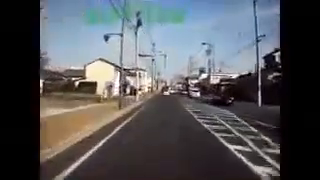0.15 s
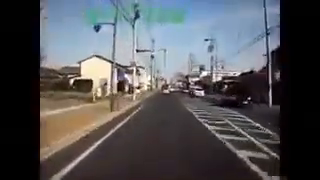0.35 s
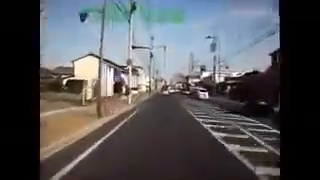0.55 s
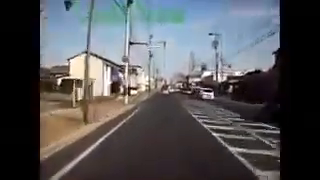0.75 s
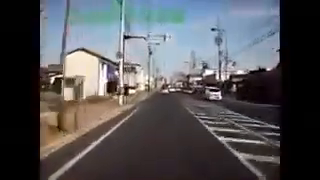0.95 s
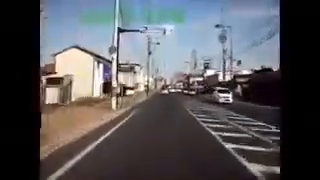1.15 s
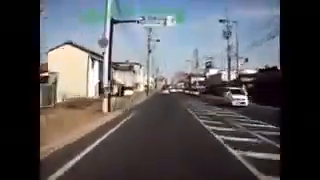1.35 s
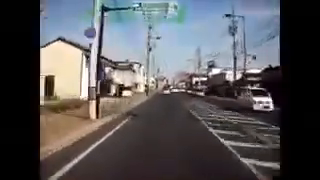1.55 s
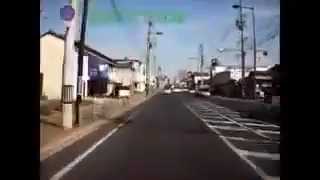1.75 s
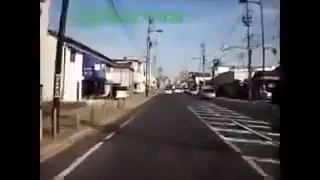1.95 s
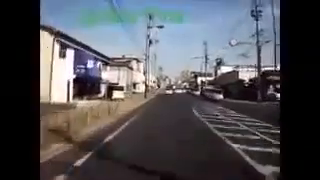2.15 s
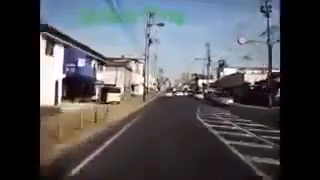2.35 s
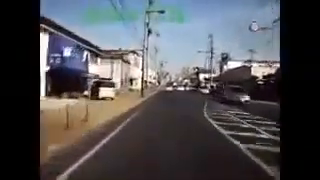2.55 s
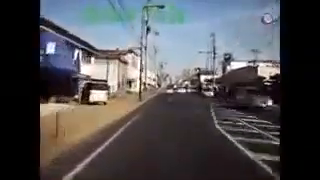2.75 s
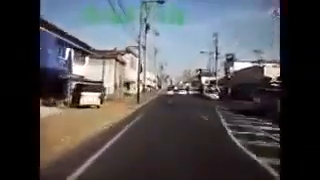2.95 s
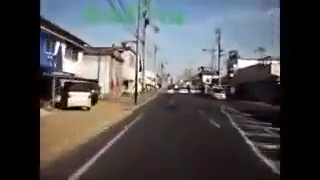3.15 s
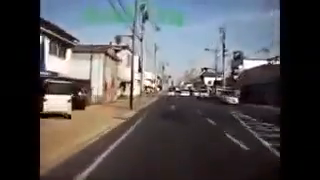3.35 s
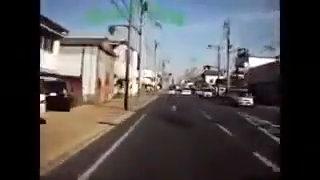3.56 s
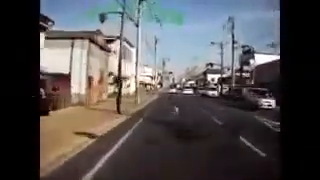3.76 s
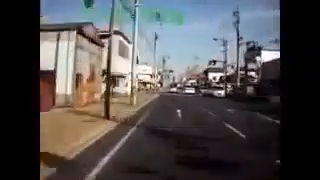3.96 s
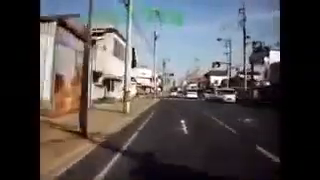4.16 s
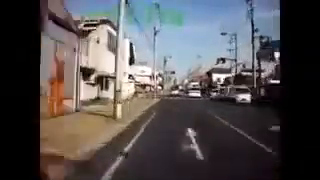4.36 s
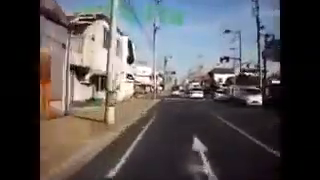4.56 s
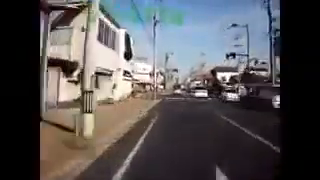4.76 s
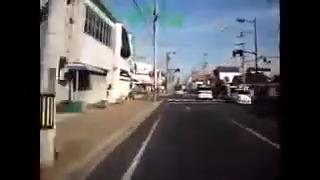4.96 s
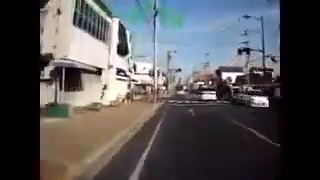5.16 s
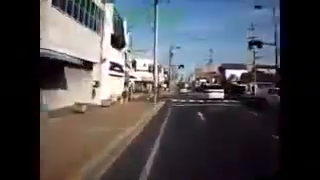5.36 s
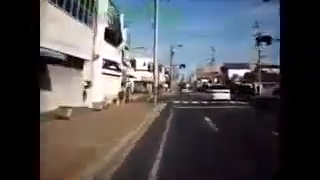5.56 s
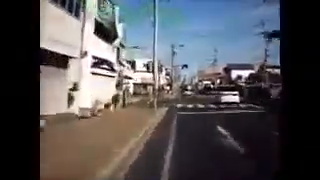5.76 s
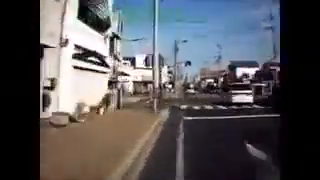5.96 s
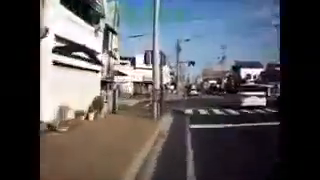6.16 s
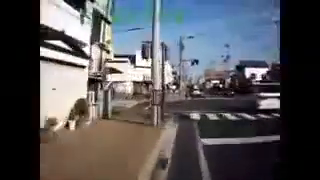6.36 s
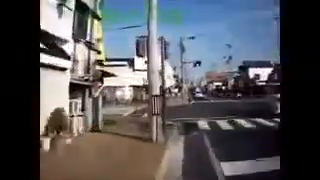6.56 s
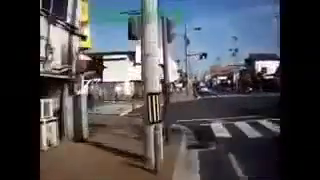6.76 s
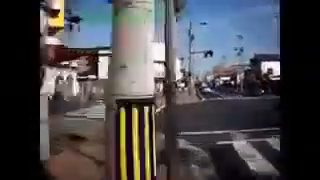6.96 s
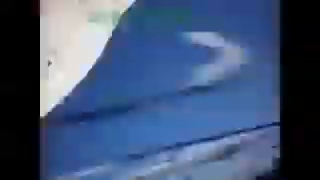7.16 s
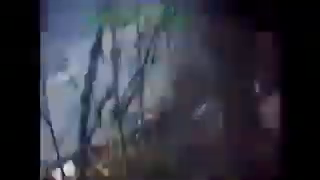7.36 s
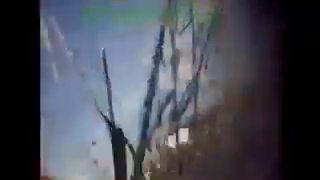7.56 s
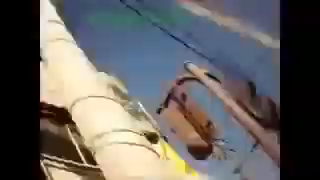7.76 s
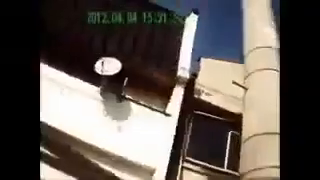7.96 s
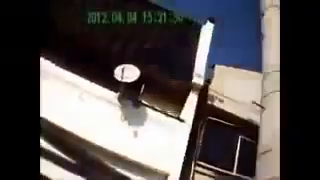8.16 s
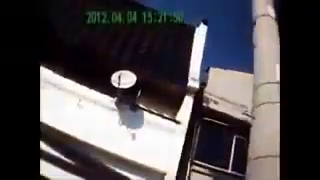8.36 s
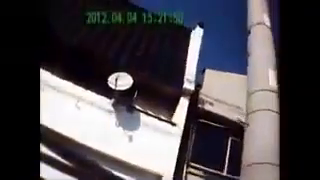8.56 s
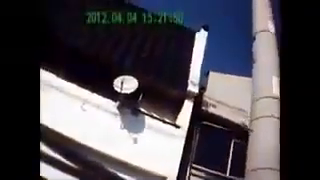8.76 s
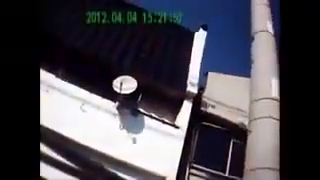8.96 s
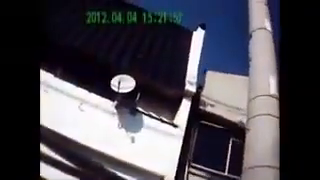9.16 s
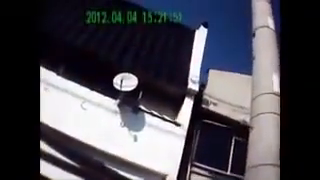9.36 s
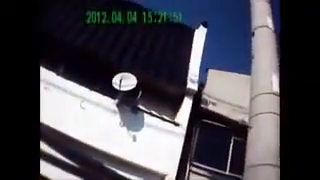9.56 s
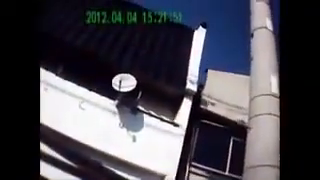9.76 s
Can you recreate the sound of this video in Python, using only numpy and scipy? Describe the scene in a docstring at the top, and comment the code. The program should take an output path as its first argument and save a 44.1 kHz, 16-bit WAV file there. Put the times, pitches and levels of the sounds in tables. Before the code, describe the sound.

A dashboard microphone picks up the steady drone of tyres and a low engine in a car's cabin. Late on, a sudden, very loud crash breaks in, clipped and distorted, with shattering glass and short metal screeches. A run of thuds and crunches follows as the car tumbles. The blows weaken, leaving light metallic clinks, a few plastic cracks and a slowly fading mechanical whirr.

```python
"""Inside a car on a town road: tyres and engine drone until it hits a pole at 7.24 s and rolls over.
Blows ring the modes of the body, sheet metal crumples and screeches, and glass bursts, driving the
dashboard microphone far into saturation. The wreck rocks to rest while a loose metal piece clinks,
plastic trim snaps and the running gear whirrs on."""
import sys
import numpy as np
from scipy import signal
from scipy.fft import rfft, irfft, next_fast_len
from scipy.io import wavfile
from scipy.ndimage import uniform_filter1d

SR = 44100
rng = np.random.default_rng(int(sys.argv[2]) if len(sys.argv) > 2 else 0)


def pcm_store(signal):
    """Save signal as 16-bit PCM."""
    levels = np.round(np.clip(np.atleast_2d(signal), -1, 1) * 32767)
    wavfile.write(sys.argv[1], SR, levels.astype(np.int16).T)


N = 436576
TIME = np.arange(N) / SR
IMPACT_S = 7.243


# Modes of the car body: (frequency [Hz], level [dB], T60 [s])
BODY_MODES = [(57.6, -2, 0.13), (129, 1.5, 0.11), (182.1, 1, 0.12), (234.2, 4.5, 0.082), (300.5, -7, 0.18),
              (401.3, 3, 0.11), (579.4, 1.5, 0.096), (701.5, 0, 0.081), (1193, -6.5, 0.065)]
def knock(db, spot_hz, t60_scale=1):
    """Modal excitation: a blow rings the body, most strongly in the modes the struck spot favours."""
    sound = 0
    for hz, mode_db, t60 in BODY_MODES:
        gain = undb(mode_db + mode_coupling(hz, spot_hz, db_per_octave=17, deepest_db=60.5))
        sound += gain * ring(hz * (1 + 0.021 * rng.standard_normal()), t60 * t60_scale)
    sound *= 1 - np.exp(-TIME[:len(sound)] / 0.0029)  # the panel yields before it rings
    return undb(db) * sound / np.abs(sound).max()


# Blows to the body: (time [s], peak level [dB], favoured frequency [Hz])
BODY_BLOWS = [(7.243, 14.5, 650), (7.262, 15, 265), (7.281, 15.5, 420), (7.298, 16, 566), (7.396, 15, 200),
              (7.443, 13, 150), (7.508, 11, 201), (7.565, 7, 106.5), (7.752, 16.5, 182), (7.803, 11.5, 125),
              (7.856, 13, 150), (7.885, 9, 160), (7.924, 10, 160), (7.95, 10, 180), (8.052, 11, 250),
              (8.079, 14, 297), (8.135, 5.5, 148), (8.175, 9.5, 198), (8.295, 11, 384), (8.384, 11.5, 175),
              (8.445, 6, 230), (8.535, 3.5, 181), (8.625, 7.5, 195), (8.728, 8, 390), (8.822, -3, 700),
              (9.022, -5, 690), (9.174, -15, 380.1), (9.24, -17, 410), (9.329, -18, 400),
              (9.406, -15.5, 234), (9.492, -10, 1140)]
def blows():
    """Superposition: the body's responses to the collision and the tumble add up."""
    out = np.zeros(N)
    for s, db, spot_hz in BODY_BLOWS:
        add(out, s, knock(db, spot_hz))
    return out


# Spectra of buckling frame, crumpling sheet and breaking glass: (frequency [Hz], relative level [dB])
FRAME_SPECTRUM = [(20, -11.5), (55, -3.5), (90, -6), (140, 1.5), (240, -0.5), (350, 2.5), (600, -4.5),
                  (1000, -14.5), (2500, -48)]
SHEET_SPECTRUM = [(150, -28), (400, -2), (650, 0), (900, -1.5), (1100, 0), (1230, 0), (1400, -1.5),
                  (1650, -6.5), (2100, -6.5), (3000, -23.5), (6000, -33.5), (10000, -36.5)]
GLASS_SPECTRUM = [(800, -18), (1800, -2.5), (2200, -0.5), (2800, -3), (3400, -0.5), (3800, 0), (4300, -1),
                  (5600, -4.5), (7000, -7), (9000, -5)]
# Crash stages: the pole strikes, glass bursts, the front folds, the car tips, slides and grinds to a halt:
# (time [s], attack [s], hold [s], release [dB/s], frame level [dB], sheet level [dB], glass level [dB])
CRASH_STAGES = [(7.239, 0.017, 0.063, 596, 7.5, 7.5, 1), (7.304, 0.022, 0.094, 87, -20, 4.5, 19),
                (7.38, 0.053, 0.058, 82, 6, 10, 3), (7.55, 0.029, 0.18, 120, 4, 2, -4),
                (7.848, 0.004, 0.59, 113, 1, -1.5, -5), (8.351, 0.033, 0.25, 39, -3.5, -4, -17)]
def crushing():
    """Acoustic emission: dense fractures sound through frame, panels and glass, which yield in jerks."""
    power = sum(np.outer(undb(levels_db), envelope(s, attack, hold, release)) ** 2
                for s, attack, hold, release, *levels_db in CRASH_STAGES)
    frame_gain, sheet_gain, glass_gain = np.sqrt(power)
    jerks = walk(60)
    frame = unit(colour(fractures(rate=1400, spread_db=-1.5), FRAME_SPECTRUM)) * frame_gain
    sheet = unit(colour(fractures(rate=3000, spread_db=2), SHEET_SPECTRUM)) * sheet_gain
    glass = unit(colour(fractures(rate=6000, spread_db=0), GLASS_SPECTRUM)) * glass_gain
    return frame + sheet * undb(1.84 * jerks) + glass * undb(3.6 * jerks)


# Single folds of sheet metal: (time [s], level [dB], T60 [s])
PANEL_FOLDS = [(7.578, 10, 0.12), (7.654, 10, 0.2), (7.771, 10, 0.13), (7.841, 15, 0.075), (7.869, 8, 0.07),
               (7.897, 10.5, 0.14), (7.945, 6.5, 0.15), (7.968, 8, 0.15), (7.996, 9, 0.36),
               (8.124, 7, 0.13), (8.225, 4, 0.14), (8.407, 9, 0.12), (8.437, 7.5, 0.2), (8.495, 6, 0.19),
               (8.555, 4.5, 0.15), (8.615, -7, 0.13), (8.70, -4, 0.12), (8.82, -9, 0.13),
               (8.905, -16, 0.12), (8.939, -15, 0.18)]
def crunches():
    """Buckling: each fold releases a quickly dying burst of fractures, with some gritty glass."""
    breaks = fractures(rate=2500, spread_db=4)
    sheet = unit(colour(breaks, SHEET_SPECTRUM))
    grit = undb(-10.5) * unit(colour(breaks, GLASS_SPECTRUM))
    return bursts(PANEL_FOLDS) * (sheet + grit)


# Tearing and sliding panels:
# (time [s], duration [s], starting frequency [Hz], glide [octaves/s], pitch jitter [ratio], level [dB])
PANEL_SLIPS = [(7.322, 0.06, 3880, 0, 0.015, 12), (7.389, 0.068, 3930, 0, 0.016, 10.5),
               (7.348, 0.052, 4900, -0.5, 0.014, 4), (7.367, 0.047, 2530, 0.5, 0.036, 3),
               (7.364, 0.06, 1200, 0.5, 0.05, 3), (7.443, 0.043, 1260, 0, 0.04, 9),
               (7.42, 0.081, 2530, -4, 0.08, 4), (7.5, 0.04, 1231, 0, 0.045, 9.5),
               (7.492, 0.066, 3750, 0, 0.012, 1), (7.644, 0.025, 1030, 14, 0.11, 5),
               (7.671, 0.029, 310, 38.5, 0.21, 7), (7.913, 0.0091, 430, -0.5, 0.16, 8),
               (7.95, 0.016, 400, -0.5, 0.16, 3), (8.144, 0.021, 647, -5, 0.11, 4),
               (8.18, 0.025, 305, 15.5, 0.15, 6), (8.229, 0.052, 430, -2.5, 0.15, 4),
               (8.214, 0.074, 4100, -1.6, 0.02, -5.5), (8.248, 0.02, 1347, 0, 0.029, 5.5),
               (8.318, 0.018, 780, 0.5, 0.1, 5), (8.353, 0.021, 640, -0.5, 0.11, 4),
               (8.572, 0.033, 390, 13, 0.17, -4), (8.601, 0.02, 910, -0.5, 0.086, -1),
               (8.635, 0.025, 294, 5.5, 0.22, 2), (8.694, 0.022, 850, -9, 0.1, -6)]
def screeches():
    """Stick-slip friction: metal on metal gives rough tones that glide, waver and jitter in pitch."""
    out = np.zeros(N)
    waver, jitter, grip = .004 * walk(90), walk(900), undb(3.2 * walk(160))
    for s, length, hz, glide, roughness, db in PANEL_SLIPS:
        span = slice(int(s * SR), int(s * SR) + SR // 4)
        age = TIME[span] - s
        pitch = hz * (1 + waver[span] + roughness * jitter[span]) * 2 ** (glide * np.minimum(age, length))
        swell = np.clip(age / 0.0059, 0, 1) * undb(-700 * np.maximum(age - length, 0))
        add(out, s, undb(db) * swell * np.sin(phase_of(pitch)))
    return out * grip


# Jolts of the shell: (time [s], period [s], peak level [dB])
SHELL_JOLTS = [(7.251, 0.017, 14.5), (7.487, 0.011, 15), (7.533, 0.013, 13.5), (7.562, 0.013, 14),
               (8.476, 0.014, 2), (9.488, 0.016, -30)]
def jolts():
    """Compression of enclosed air: at each jolt the cabin pressure drops and swings back in one thump."""
    out = np.zeros(N)
    for s, period, db in SHELL_JOLTS:
        add(out, s, -undb(db) * np.sin(2 * np.pi * TIME[:int(period * SR)] / period))
    return out


def shards(count=70, start_s=7.32, mean_delay_s=0.08, low_hz=4260, high_hz=10200, loss_db_per_s=56):
    """Free vibration: glass splinters ping at random pitches, fewer and weaker as the burst dies away."""
    out = np.zeros(N)
    for when, pitch, size in rng.random((count, 3)):
        delay = -mean_delay_s * np.log(1 - when)
        hz = low_hz * (high_hz / low_hz) ** pitch
        add(out, start_s + delay, size * undb(12.5 - loss_db_per_s * delay) * ring(hz, t60=0.067))
    return out


def settling(landings=3, drop_s=9.001, rebound_s=0.062, loss_db=8.5):
    """Inelastic rebound: the wreck shudders in its lowest mode, drops and bounces, weaker each time."""
    shudder = np.sin(phase_of(BODY_MODES[0][0] * (1 + 0.027 * walk(25))))
    out = undb(-19.5) * envelope(8.76, .03, 0.23, 200) * shudder
    for k in range(landings):
        landing = knock(db=5 - k * loss_db, spot_hz=253, t60_scale=0.79)  # the ground damps the body
        add(out, drop_s + k * rebound_s, landing)
    return out


# Modes of a loose metal piece: (frequency [Hz], relative level [dB], T60 [s])
PIECE_MODES = [(4748, -1, 0.2), (5568, 1, 0.12), (8480, 2.5, 0.11)]
# Scratch of its edge: (frequency [Hz], relative level [dB])
SCRATCH_SPECTRUM = [(2500, -29), (4500, -6), (5800, 6), (7000, -5), (9000, 0)]
# Its landings: (time [s], relative level [dB], favoured frequency [Hz])
PIECE_LANDINGS = [(8.21, -3, 5570), (8.666, -9, 5570), (8.739, -1, 5570), (8.752, -1, 5570),
                  (8.778, -10, 4750), (8.824, -18, 8470), (8.884, -16, 5070), (8.938, -26, 4750),
                  (9.002, -7.5, 5570), (9.03, -17, 5570), (9.062, -18, 5450), (9.18, -7, 5150),
                  (9.207, -12, 4850), (9.105, -27, 5200), (9.376, -31, 4750)]
def clinks(count=5, chatter_s=0.018, scratch_db=-22):
    """Contact chatter: each landing is a quick run of impulses that scratch and ring the metal piece."""
    ringing, scratch = np.zeros(N), np.zeros(N)
    for s, db, spot_hz in PIECE_LANDINGS:
        when, size = rng.random((2, count))
        contact_s = (np.arange(count) + when) / count * chatter_s
        contacts = np.zeros(SR // 2)
        contacts[(contact_s * SR).astype(int)] = .5 + size
        add(scratch, s, undb(db + scratch_db) * signal.fftconvolve(contacts, fade(t60=0.035)) / 2)
        for hz, mode_db, t60 in PIECE_MODES:
            tone = signal.fftconvolve(contacts, ring(hz * (1 + 0.003 * rng.standard_normal()), t60))
            gain = undb(db + mode_db + mode_coupling(hz, spot_hz, db_per_octave=72, deepest_db=15.5))
            add(ringing, s, gain * tone / np.abs(tone).max())
    flutter = undb(3 * walk(170))  # the piece tumbles
    return ringing * flutter + scratch * noise(SCRATCH_SPECTRUM)


# Spectrum of cracking plastic: (frequency [Hz], relative level [dB])
PLASTIC_SPECTRUM = [(700, -2.5), (1150, -0.5), (1600, -10), (2600, -6.5), (3100, 7.5), (3400, -11),
                    (3700, 7.5), (4300, -13), (6200, -4), (7200, -20.5), (9000, -23)]
# Cracks in the trim: (time [s], level [dB], T60 [s])
TRIM_CRACKS = [(7.841, 3, 0.033), (8.04, 1, 0.04), (8.135, 3, 0.042), (8.405, -3, 0.034),
               (8.487, 4.5, 0.077), (9.004, -17, 0.058), (9.487, -5, 0.033)]
def snaps():
    """Brittle fracture: plastic trim cracks in short bursts, each with a duller echo in the cabin."""
    cracks = bursts(TRIM_CRACKS)
    tail = fade(t60=0.17)
    echo = signal.fftconvolve(cracks, tail / tail.sum())[:N]
    return cracks * noise(PLASTIC_SPECTRUM) + undb(3.5) * echo * noise(SHEET_SPECTRUM)


# Spectra of road rumble through the body and of tread hiss: (frequency [Hz], relative level [dB])
RUMBLE_SPECTRUM = [(20, -26.5), (38, -17), (54, -9.5), (68, -10.5), (105, -12), (132, -1.5), (168, -7),
                   (208, 1.5), (240, 2), (300, 0.5), (385, 0), (445, -7), (540, -4), (800, -4), (900, -9.5),
                   (1170, -61)]
TREAD_SPECTRUM = [(600, -12.5), (900, -1.5), (1060, 6.5), (1140, 2), (1215, 4), (1320, -2.5), (1500, -8),
                  (2000, -15.5), (2800, -24.5), (3900, -25.5), (5000, -33), (8000, -50), (11000, -80.5)]
# Rough stretches of road: (time [s], duration [s], level relative to the smooth road [dB])
ROUGH_ROAD = [(0.677, 0.92, -5.5), (2.0, 0.35, -9), (5.9, 0.27, -6)]
def tyres(rumble_db=-13.72, tread_db=-19):
    """Rolling noise: the tread hisses and the road shakes the body; rough stretches add in power."""
    added_power = sum((undb(db) * envelope(s, 0.07, length, 50)) ** 2 for s, length, db in ROUGH_ROAD)
    rumble = noise(RUMBLE_SPECTRUM) * np.sqrt(1 + added_power) * undb(rumble_db + .5 * walk(8.3))
    tread = noise(TREAD_SPECTRUM) * undb(tread_db + .5 * walk(14))
    return rumble + tread


# Engine harmonics: (multiple of the firing rate [1], level [dB])
ENGINE_HARMONICS = [(2, -41), (4, -32)]
def engine(firing_hz=62.2):
    """Periodic excitation: the engine hums at harmonics of its slightly wandering firing rate."""
    phase = phase_of(firing_hz * (1 + .025 * walk(6)))
    return sum(undb(db + 3 * walk(16)) * np.sin(k * phase) for k, db in ENGINE_HARMONICS)


def drive_whine(start_s=0.25, hold_s=2.0, start_hz=796, rise_hz_per_s=7.5):
    """Forced vibration: the drive under power gives a faint tone that slowly rises."""
    hz = (start_hz + rise_hz_per_s * (TIME - start_s)) * (1 + 0.001 * walk(8))
    return np.sin(phase_of(hz)) * envelope(start_s, 0.38, hold_s, 25) * undb(-26 + 2.5 * walk(5))


# Spectrum of the whirring running gear: (frequency [Hz], relative level [dB])
WHIRR_SPECTRUM = [(24, -67), (40, -22), (234, -2), (275, -7), (413, 2.5), (580, -3.5), (680, 3.5),
                  (833, -3), (1140, -1.5), (1640, -10), (2020, -10), (2770, -25), (3800, -16.5),
                  (4400, -22.5), (6120, -25.5), (9000, -30), (10000, -73)]
# Its resonances: (frequency [Hz], level [dB], T60 [s])
GEAR_MODES = [(480, -33.5, 0.14), (696, -36, 0.14), (1152, -30, 0.099), (1290, -31.5, 0.14)]
def whirr():
    """Resonance driven by friction: the running gear turns on in the wreck, sings and slowly dies down."""
    swell = envelope(IMPACT_S, attack_s=1.36, hold_s=0, release_db_per_s=5.5)
    rubbing = rng.standard_normal(N)
    singing = sum(undb(db) * resonate(rubbing, hz, t60) for hz, db, t60 in GEAR_MODES)
    return (noise(WHIRR_SPECTRUM) * undb(-19 + .8 * walk(25)) + singing) * swell


def rattle(start_s=8.55, hold_s=0.35):
    """Random impact excitation: light touches of small debris ring one well-damped panel."""
    ringing = resonate(fractures(rate=600, spread_db=-0.5), hz=3800, t60=0.014)
    return ringing * undb(-36 + 2.5 * walk(40)) * envelope(start_s, 0.1, hold_s, 25)


def undb(db):
    """Decibels to amplitude ratio."""
    return 10 ** (np.asarray(db) / 20)


def unit(x):
    """Normalisation to rms 1."""
    return x / np.std(x)


def colour(x, points):
    """Minimum-phase filter through points of (frequency [Hz], gain [dB])."""
    hz, db = np.transpose(points)
    size = next_fast_len(N + SR // 2) * 2
    f = np.arange(size // 2 + 1) * SR / size
    gain = undb(np.interp(np.log(f + 1), np.log(hz), db))
    cepstrum = irfft(np.log(gain))
    cepstrum[1:size // 2] *= 2  # folding onto positive time makes the filter causal
    cepstrum[size // 2 + 1:] = 0
    return irfft(rfft(x, size) * np.exp(rfft(cepstrum)))[:N]


def noise(points):
    """Gaussian noise of rms 1 with the given spectrum."""
    return unit(colour(rng.standard_normal(N), points))


def walk(rate):
    """Random modulation of spread 1, with rate new values a second."""
    step = int(SR / rate)
    stairs = np.repeat(rng.standard_normal(N // step + 1), step)
    return unit(uniform_filter1d(stairs, step)[:N])


def fractures(rate, spread_db):
    """Poisson process: impulses of uneven size, rate a second on average."""
    sizes = rng.standard_normal(N) * undb(spread_db * np.minimum(rng.exponential(size=N), 4))
    return unit(sizes * (rng.random(N) < rate / SR))


def phase_of(hz):
    """Phase as the integral of frequency."""
    return 2 * np.pi * np.cumsum(hz) / SR


def fade(t60):
    """Half a second of exponential decay, falling 60 dB in t60 seconds."""
    return np.exp(-np.log(1000) * TIME[:SR // 2] / t60)


def ring(hz, t60):
    """Impulse response of one damped mode."""
    return np.sin(2 * np.pi * hz * TIME[:SR // 2]) * fade(t60)


def resonate(force, hz, t60):
    """Forced response of one mode, at rms 1."""
    return unit(signal.fftconvolve(force, ring(hz, t60))[:N])


def mode_coupling(hz, spot_hz, db_per_octave, deepest_db):
    """Modal coupling in dB: weaker the farther a mode lies from the pitch the struck spot favours."""
    return -min(db_per_octave * abs(np.log2(hz / spot_hz)), deepest_db)


def envelope(s, attack_s, hold_s, release_db_per_s):
    """Linear attack from time s, hold, then exponential decay."""
    age = TIME - s
    return np.clip(age / attack_s, 0, 1) * undb(-release_db_per_s * np.maximum(age - attack_s - hold_s, 0))


def bursts(events):
    """Summed exponential decays, one for each (time [s], level [dB], T60 [s])."""
    out = np.zeros(N)
    for s, db, t60 in events:
        add(out, s, undb(db) * fade(t60))
    return out


def add(out, s, sound):
    """Superpose a sound at time s."""
    i = int(s * SR)
    out[i:i + len(sound)] += sound[:N - i]


def saturate(x, rail):
    """Soft clipping: rounds off what comes near the rail."""
    return x / (1 + (x / rail) ** 4) ** (1 / 4)


def first_order(x, hz, kind):
    """Low-pass or high-pass of 6 dB per octave."""
    return signal.sosfilt(signal.butter(1, hz, kind, fs=SR, output="sos"), x)


def scene():
    """Superposition at the windscreen: the driving sounds end as the crash begins."""
    crash = crushing() + crunches() + shards() + screeches() + blows() + jolts()
    driving = (tyres() + engine() + drive_whine()) * np.clip(1 - (TIME - IMPACT_S) / 0.13, 0, 1)
    return (crash + driving + settling() + clinks() + rattle() + snaps() + whirr())[None]


# Microphone response: (frequency [Hz], gain [dB])
MIC_RESPONSE = [(100, -1), (1000, 1), (2800, -0.5), (3800, -1), (5000, -2), (7000, -2), (9000, -16.5)]
def record(dry, lower_rail=0.27, upper_rail=0.64, bias_shift=0.51, coupling_hz=34, leak_db=-21):
    """Asymmetric clipping: overload makes square waves whose tops sag through the coupling capacitor."""
    x = dry[0]
    # heavy overload pushes the working point towards the upper rail
    x = x + bias_shift * first_order(np.maximum(np.abs(x) - lower_rail, 0), 9.8, "low")
    # a little treble leaks past the saturated stage and fizzes on the flat tops
    treble = first_order(first_order(x, 3200, "high"), 3200, "high")
    x = saturate(x, np.where(x > 0, upper_rail, lower_rail)) + undb(leak_db) * saturate(treble, 1)
    x = colour(first_order(x, coupling_hz, "high"), MIC_RESPONSE)
    band_edge = signal.ellip(6, .3, 20, 8950, fs=SR, output="sos")
    top_cut = signal.ellip(12, .2, 70, 10960, fs=SR, output="sos")
    return signal.sosfilt(top_cut, signal.sosfilt(band_edge, x))[None]


dry = scene()
out = record(dry)
pcm_store(out)
```